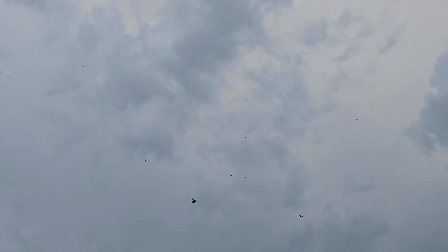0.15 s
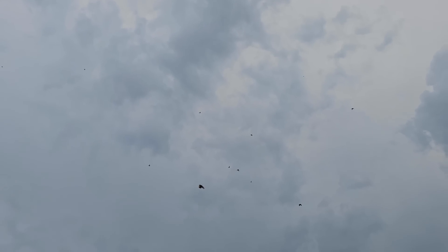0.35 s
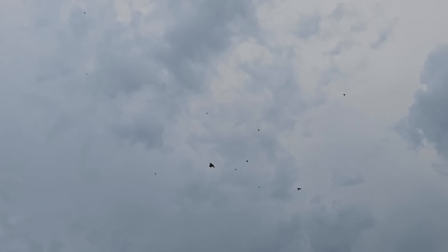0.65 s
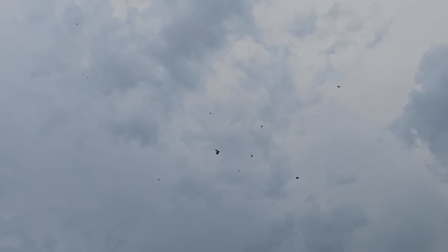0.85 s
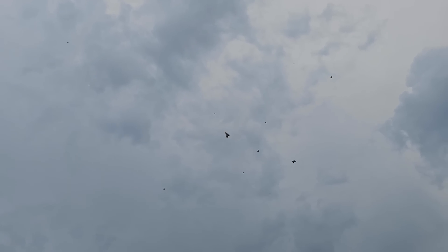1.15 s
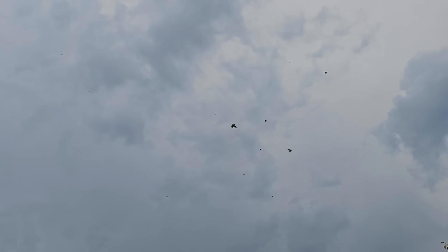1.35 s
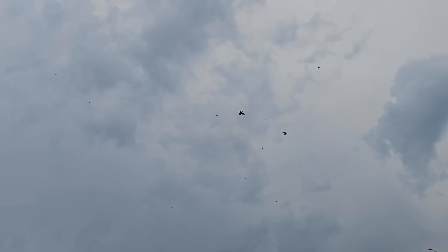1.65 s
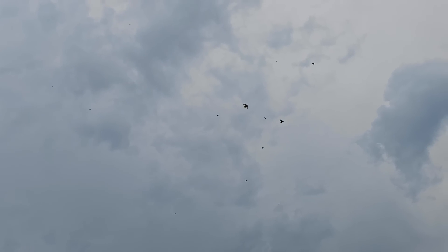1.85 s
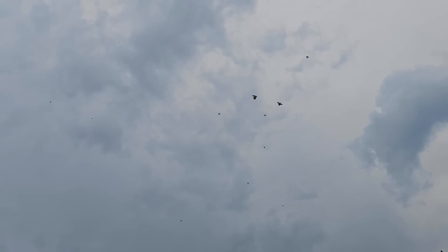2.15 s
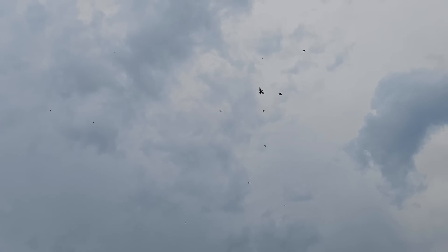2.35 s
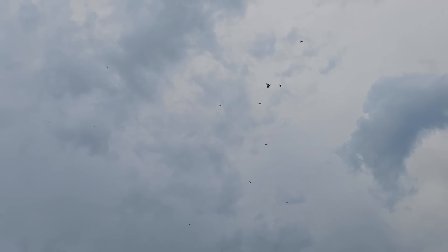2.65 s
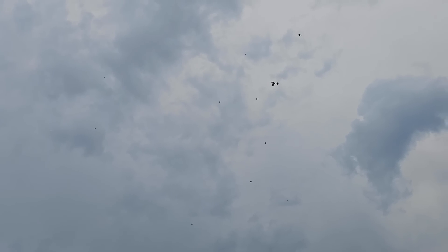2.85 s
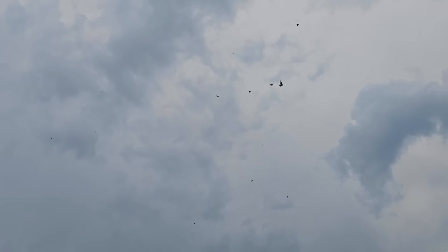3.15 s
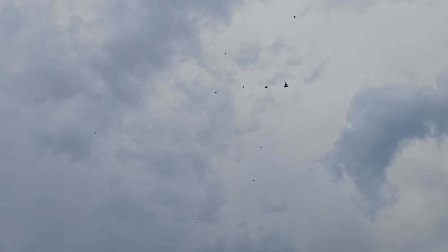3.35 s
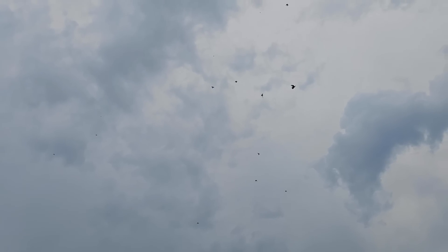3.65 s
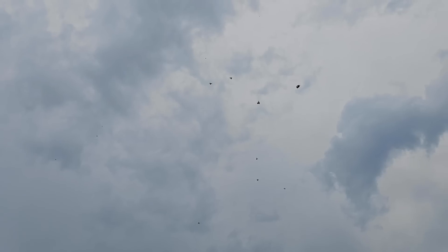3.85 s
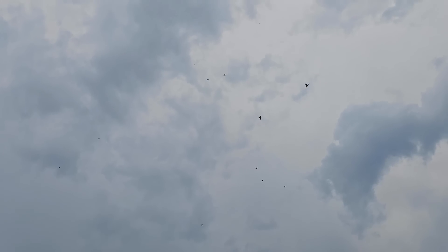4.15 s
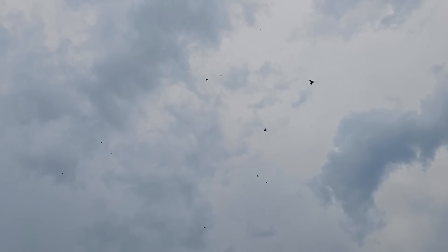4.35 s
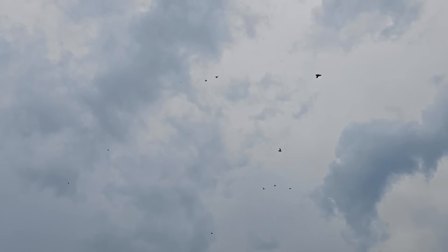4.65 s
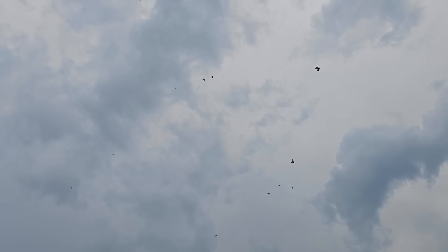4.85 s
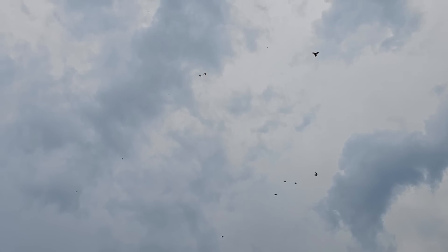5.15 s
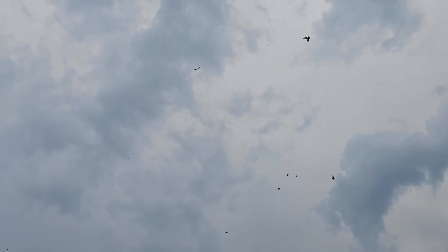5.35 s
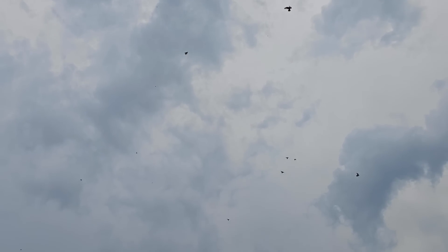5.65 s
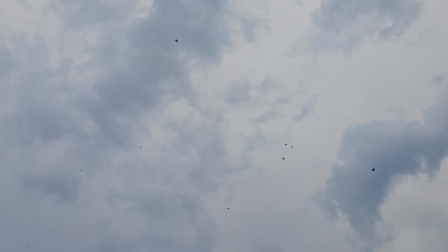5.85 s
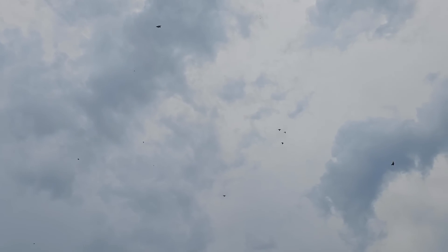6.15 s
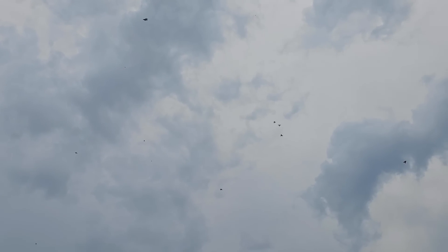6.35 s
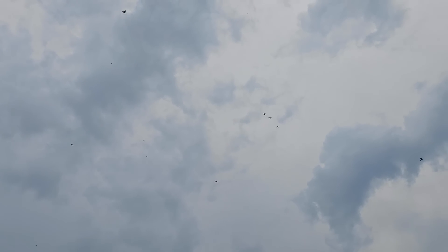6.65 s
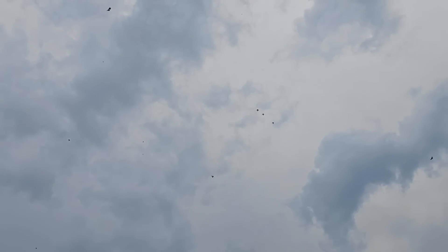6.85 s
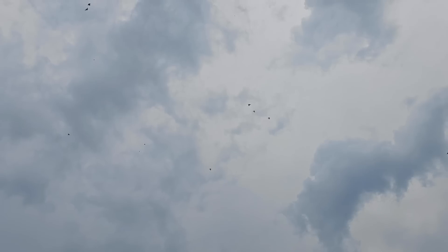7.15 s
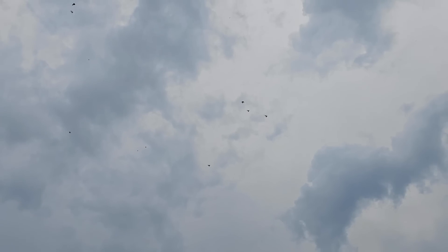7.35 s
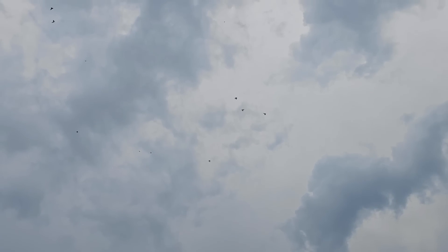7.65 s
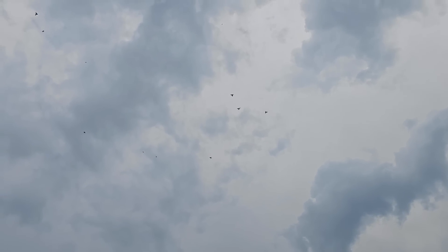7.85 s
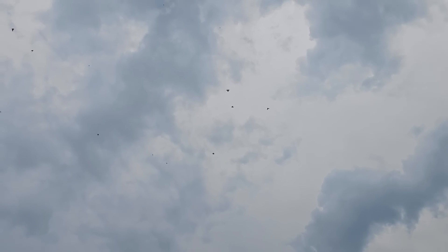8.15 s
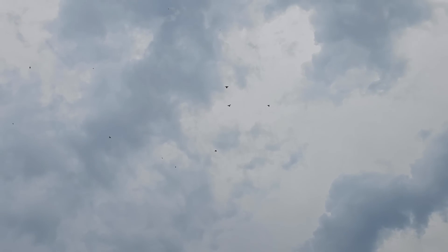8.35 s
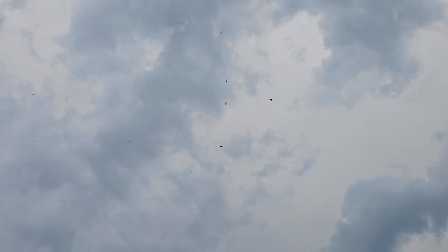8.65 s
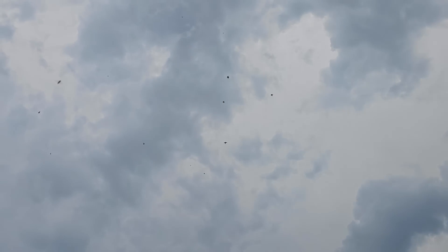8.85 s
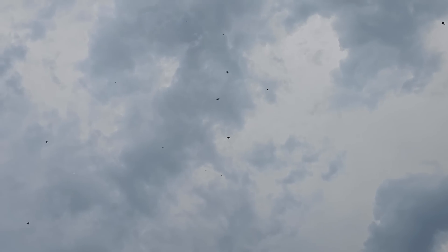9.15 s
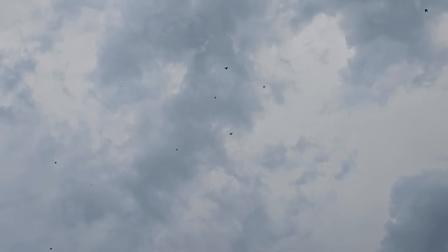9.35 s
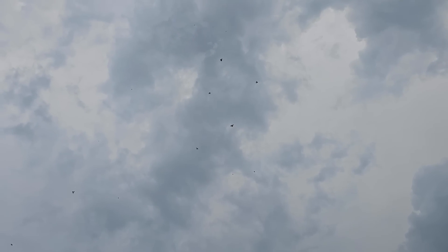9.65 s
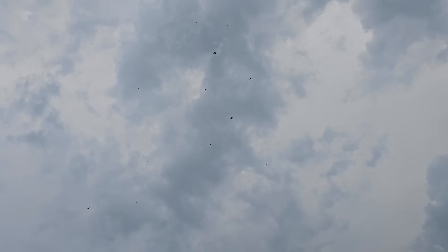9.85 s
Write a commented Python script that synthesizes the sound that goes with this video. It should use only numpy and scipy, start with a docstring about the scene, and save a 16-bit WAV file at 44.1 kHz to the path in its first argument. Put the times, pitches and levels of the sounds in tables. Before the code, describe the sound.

Wind buffets the microphone throughout with uneven low thuds, strongest around 1.3 seconds, from 6.7 to 7.4, and near 8.8. A young pigeon, slightly to the left, gives thin, high, wavering squeals, each about half a second long, repeating roughly every 0.7 seconds, then weaker and more spaced after 6 seconds. Pigeons fly about with scattered wing claps and soft feather rustles, clearer from 2 seconds. Birds land on a hollow board with light knocks at about 4.4 and 6.7 seconds. Quiet cooing runs underneath, swelling around 7.5 to 8 seconds. Small birds whistle and chirp far off, mostly in the first 3 seconds, over a faint town hiss. From 8.7 seconds a quick run of sharper wing claps builds, joined by a brief scrape on the microphone at 9.6 and a few small wind pops until the end at 10.

```python
"""Pigeons on an open roof, heard by a small camera with two spaced microphones.
A young pigeon squeals again and again with two membranes; wing tips clap, feathers rustle, birds
land on a hollow board and the flock coos from inflated crops. Gusts thud and pop on the microphones
and something brushes the camera. Small birds whistle and chirp far off over the hiss of the town."""
import sys
import numpy as np
from scipy import signal
from scipy.fft import rfft, irfft
from scipy.io import wavfile
from scipy.ndimage import uniform_filter1d

SR = 44100
rng = np.random.default_rng(int(sys.argv[2]) if len(sys.argv) > 2 else 0)


def store_wav(level_fs):
    """Save 16-bit WAV to argv[1]."""
    pcm = np.round(np.clip(np.atleast_2d(level_fs), -1, 1) * 32767)
    wavfile.write(sys.argv[1], SR, pcm.T.astype(np.int16))


N = 441000

# Noise spectra. Each row: frequency in Hz, relative density in dB.
TOWN_SPECTRUM = [(120, -77), (200, -7), (254, 1.5), (366, -19.5), (491, -8), (968, -18.5), (2050, -18),
                 (2610, -23.5), (4430, -16), (5840, -25), (8120, -27.5), (11300, -26.5), (16000, -36)]
COO_BLUR_SPECTRUM = [(200, -1), (290, 0.5), (400, -2), (540, 1.5), (640, -22.5), (800, -17.5)]
THUD_SPECTRUM = [(8.8, -24), (15, -15), (43, 10), (65, 7), (116, -3), (193, -31), (236, -16.5), (300, -26),
                 (390, -69), (660, -120)]
EDDY_SPECTRUM = [(60, -19), (110, 2), (160, -10), (260, -17.5), (450, -57), (1000, -91), (2500, -100)]
FEATHER_SPECTRUM = [(410, 10), (700, 3.5), (1120, -6), (1310, -0.5), (1500, -2), (1600, -3), (2770, 0),
                    (4550, 3), (7010, -9), (9990, -8), (16000, -15)]
# Far whistles. Each row: start and length in seconds, pitch, slide and arch in Hz, level in dB.
WHISTLE_NOTES = [(.33, 0.33, 897, -13, 8.5, -66), (1.189, 0.028, 864, -19, 27, -56),
                 (1.443, 0.13, 1696, 197, 21, -67.5), (2.113, 0.19, 4800, -230, 42, -64),
                 (2.267, 0.14, 2025, -32, -40, -64), (2.602, 0.076, 2640, -50, 824, -52),
                 (2.67, 0.15, 2324, -94, -11, -59), (2.854, 0.081, 2330, 25, 46, -62.5),
                 (3.438, 0.11, 2080, 45, 48, -62.5), (4.683, 0.114, 1925, -38, 10.5, -66),
                 (4.689, .07, 1270, -10, -2, -65), (7.951, 0.16, 1335, -100, 2, -65),
                 (8.545, 0.072, 1400, 34, -7, -63)]
# Sparrow chirps. Each row: start and length in seconds, level in dB.
CHIRP_NOTES = [(.565, 0.06, -62), (0.932, 0.064, -54.5), (1.302, 0.22, -62.5), (1.752, 0.1, -64),
               (2.25, 0.064, -68), (2.68, .05, -64), (2.845, 0.059, -60.5), (4.28, 0.067, -63),
               (6.32, 0.062, -56.5), (7.008, 0.049, -58), (8.564, 0.034, -58)]
# Far cooing. Each row: time in seconds, level in dB.
COOING_CURVE = [(0.0, -52), (0.22, -68.5), (1.25, -57), (1.5, -64.5), (4.46, -55), (7.32, -57),
                (7.44, -51.5), (7.71, -57.5), (7.8, -48), (8.33, -60.5), (9.89, -51.5), (10.0, -53)]
# Nearer coos. Each row: time in seconds, level in dB, pitch in Hz.
COO_PULSES = [(1.954, -51, 306), (2.944, -49, 301), (3.05, -47, 311), (3.32, -49.5, 279),
              (3.416, -47.5, 281), (3.996, -49, 312), (4.087, -52, 294), (4.791, -52, 300),
              (4.947, -50, 302), (5.081, -50, 339), (5.151, -49, 261), (6.023, -48.5, 284),
              (6.18, -47, 288), (7.427, -43, 410), (7.484, -40, 370), (7.557, -47.5, 333),
              (7.768, -45.5, 359), (7.847, -43.5, 482), (7.965, -47.5, 365)]
# Gusts. Each row: time in seconds, level in dB, eddies over that level in dB, leftward pan in dB.
GUST_CURVE = [(0.0, -30.5, 0, -6), (0.39, -42.5, -20, 0), (0.78, -30.5, -5, -11), (1.2, -40.5, -11, -3),
              (1.34, -23, -15, -12), (1.72, -42, -14.5, -6.5), (2.31, -34, -12.5, -12.5),
              (3.26, -39.5, -7, 9), (3.79, -36, -27, -11), (3.92, -48.5, -18, -5), (5.35, -38, -16.5, 4),
              (5.96, -48, -17.5, 0), (6.4, -39, -16, 4.5), (6.74, -33.5, -9.5, 20), (6.91, -37, -18, -24),
              (7.21, -34.5, -7.5, -5), (7.74, -42, -17, -1), (7.88, -32.5, -7.5, -6),
              (8.19, -38.5, -26, 3.5), (8.88, -34.5, -6.5, 10), (8.94, -32.5, -13, -5),
              (9.36, -42.5, -15, 0), (9.62, -41.5, 1, -1.5), (9.78, -39, 3, -0.5), (10.0, -47, 4, 1)]
# Wind thumps. Each row: centre in seconds, level in dB, left minus right in dB, pitch in Hz.
WIND_THUMPS = [(0.019, -25.5, 5.5, 96), (0.621, -25.5, 0, 58.0), (0.689, -23, -9, 87.5),
               (0.76, -24, -3, 66.5), (0.853, -38, 0, 76.0), (0.911, -19.5, 0, 71.0),
               (1.008, -24, -12, 97.0), (1.281, -14.5, -7, 68), (1.428, -23.5, -14, 94.5),
               (1.489, -20, -7, 70.6), (1.567, -23, -6, 73.5), (2.516, -23, 5, 81),
               (2.636, -33, -8.0, 72.5), (2.849, -21.5, 4.5, 90), (2.954, -24.5, 7, 103),
               (3.045, -23, -9, 98), (3.183, -29, 1, 69.4), (3.436, -30, 9.5, 89), (3.687, -27, -5, 78.4),
               (3.768, -29.5, -7, 89), (4.617, -30, -7, 58), (4.712, -28, -3, 53.3),
               (5.151, -28.5, -11, 76), (5.442, -23.5, 7, 68.6), (5.509, -25.5, -6.5, 90),
               (6.16, -27.5, -3.5, 51.0), (6.657, -25, 6.0, 63.0), (6.704, -19, 4, 71.6),
               (6.742, -18, 5, 66.0), (6.836, -24.5, 3, 58.7), (6.977, -22.0, -4, 67.0),
               (7.054, -24.5, -5.0, 65.0), (7.1, -24.5, -3, 69.0), (7.155, -18.5, -6, 71.0),
               (7.224, -18, -6, 84), (7.321, -17, -5.5, 74.5), (7.395, -23.5, -6, 76),
               (7.856, -25, -7, 66.4), (8.319, -29, 9.5, 79.5), (8.504, -28, 7, 65.0),
               (8.595, -22.5, 7, 72.6), (8.685, -27, 4.0, 65.0), (8.8, -17.5, 10, 72),
               (8.879, -20, 7, 62.8), (9.123, -25, -7, 65), (9.755, -21.5, 1, 85)]
# Wind pops. Each row: start in seconds, relative level in dB, left minus right in dB.
PORT_POPS = [(0.068, -49.5, -28), (0.101, -48.5, -28), (1.048, -43.5, -26.5), (1.325, -48.5, -25),
             (9.564, -48, -6), (9.67, -42, -3.5), (9.78, -47, -23), (9.862, -39, 0), (9.927, -44, -2),
             (9.968, -40, 1)]
# Landings on the board. Each row: start in seconds, level in dB.
LANDINGS = [(4.383, -46), (6.67, -37)]
# Board modes. Each row: frequency in Hz, gain in dB, T60 in seconds.
BOARD_MODES = [(815, 0, 0.011), (1550, -6, 0.019), (2390, 2, 0.039), (2570, 0.5, 0.032), (4150, -1, 0.014)]
# Flock rustle. Each row: time in seconds, level in dB, treble in dB.
RUSTLE_CURVE = [(0.0, -82, -23), (0.47, -69, -4), (0.7, -68.5, -20), (3.7, -61, -10.5), (4.18, -68, -17),
                (5.96, -62, -5.5), (6.43, -64.5, -15), (9.0, -64, -4), (9.3, -56, -2), (10.0, -68.5, -15)]
# Passing wings. Each row: centre and length in seconds, level in dB, treble in dB.
WING_SWEEPS = [(0.226, 0.42, -59, -32), (0.618, 0.21, -58.5, -20), (1.019, 0.2, -58.5, -4),
               (1.6, 0.067, -58.5, -6), (3.083, 0.21, -61.5, -12), (3.358, .06, -65, 11),
               (3.715, .06, -52, -9), (4.423, 0.12, -50.5, -26), (4.964, 0.11, -56.5, 7),
               (5.037, 0.2, -53, -9.5), (5.803, 0.11, -54, -48), (6.707, .08, -60, -34),
               (6.882, 0.15, -60.5, -3), (7.454, 0.11, -61, -1), (9.53, 0.18, -71.5, 22),
               (9.594, 0.11, -53, -9), (9.787, 0.62, -56.5, -9.5)]
# Claps. Each row: start in seconds, relative high, mid and low band levels in dB, swish re crack in dB.
WING_CLAPS = [(0.564, -63.5, -59, -80, 0.5), (0.968, -68, -57, -91, 4.5), (2.1047, -53, -39, -41.5, -28),
              (2.229, -60.5, -50.5, -64, -7), (2.399, -53, -68, -65, -20), (2.5354, -55, -56, -54, -20),
              (2.759, -47.5, -43, -46, -21), (3.121, -61, -41.5, -70, -21), (3.356, -55, -45, -45.5, -11),
              (3.711, -68, -52, -43.5, -8), (3.722, -57, -47, -49, -18), (4.384, -50.5, -40, -36, -11.5),
              (4.979, -74, -50, -53.5, -8), (5.0183, -69, -45.5, -53, -10), (5.246, -62, -52, -61, -1),
              (5.42, -57, -47, -48.5, -15), (5.67, -57, -53, -48.5, -9.5), (5.8268, -65, -58, -48, -13),
              (5.952, -60, -54.5, -84, -3), (6.4348, -65, -49, -44, -21), (6.6692, -58, -60, -41, -26),
              (7.424, -60, -54, -66, -7), (8.7218, -59, -56, -55, -8), (8.8306, -53, -48, -55, -10),
              (8.93, -50.5, -77, -52.5, -8.5), (9.0732, -33.5, -76, -42.5, -19),
              (9.203, -47, -55, -48, -16), (9.32, -37, -36, -43.5, -16), (9.4435, -48, -47, -61, -18),
              (9.562, -52, -54, -59, -10), (9.739, -40, -39.5, -40, -21)]
# Direction of the claps. Each row: start in seconds, lag of left behind right in samples.
CLAP_LAGS = [(0, -19), (4.3, 11), (5.6, -18), (6.4, 12), (8.0, -18)]
# One table per squeal. Each row: time in seconds, pitch in Hz, level in dB.
SQUEAL_CURVES = [
    [(.061, 3780, -54), (.083, 4660, -54), (.13, 4300, -49.5), (.165, 4000, -50), (.213, 4250, -45),
     (.245, 4140, -51), (.305, 4310, -42.5), (.375, 4330, -47), (.421, 4655, -46), (.469, 4370, -43),
     (.52, 4310, -46.5), (.548, 3750, -53)],
    [(.782, 3930, -53), (.826, 4130, -50), (.878, 3920, -41), (.915, 4164, -46), (.95, 4095, -44.5),
     (1.004, 4405, -41), (1.022, 4426, -60), (1.036, 3980, -53), (1.095, 4300, -47.5), (1.13, 4180, -48.5),
     (1.175, 4830, -55), (1.24, 4780, -59)],
    [(1.439, 3720, -54), (1.453, 4230, -54.5), (1.55, 4140, -50.5), (1.735, 4250, -44), (1.757, 4150, -46),
     (1.785, 3840, -50), (1.80, 4224, -49.5), (1.881, 4160, -48.5), (1.922, 3770, -47.5)],
    [(2.195, 3890, -50), (2.239, 3870, -45), (2.255, 3820, -59), (2.3, 4030, -47), (2.34, 4300, -53.5),
     (2.45, 4260, -49), (2.483, 4000, -58), (2.505, 4290, -45), (2.535, 4210, -46.5), (2.645, 4260, -52),
     (2.67, 3830, -53)],
    [(2.94, 3770, -54), (2.961, 3940, -46), (2.989, 3860, -50), (3.02, 3990, -54.5), (3.077, 4130, -51.5),
     (3.135, 4330, -49.5), (3.159, 4270, -48), (3.33, 4114, -47.5), (3.365, 4260, -44), (3.4, 4330, -48.5),
     (3.45, 3980, -66)],
    [(3.643, 3940, -49), (3.68, 4250, -43.5), (3.71, 4060, -47), (3.755, 4300, -50), (3.89, 4264, -41),
     (3.915, 4190, -48), (3.953, 4230, -42.5), (3.968, 4730, -49), (3.991, 4800, -53.5), (4.035, 4350, -45),
     (4.12, 4110, -48.5), (4.155, 3630, -58)],
    [(4.413, 3790, -58), (4.427, 4010, -48), (4.477, 4290, -50), (4.519, 4060, -55), (4.557, 4310, -47),
     (4.633, 4240, -48.5), (4.717, 4480, -46), (4.749, 4270, -49), (4.767, 3680, -48.5), (4.785, 3650, -56)],
    [(5.07, 3970, -51), (5.15, 4110, -55), (5.17, 4780, -54.5), (5.21, 4530, -51.5), (5.275, 3900, -51.5),
     (5.3, 4170, -48.5), (5.382, 4197, -46.5), (5.43, 4090, -47), (5.455, 3770, -62), (5.5, 3790, -45)],
    [(5.85, 3750, -72), (6.033, 3920, -52), (6.073, 3863, -48.5), (6.131, 4060, -51), (6.157, 3900, -48),
     (6.205, 3930, -58), (6.23, 4110, -52), (6.31, 4160, -53), (6.37, 3610, -61)],
    [(6.725, 3950, -63), (6.802, 3750, -58.5), (6.864, 3940, -52), (6.885, 4270, -60), (6.925, 4000, -55),
     (7.106, 3850, -51.5), (7.14, 3800, -66), (7.23, 3550, -60)],
    [(7.87, 3808, -65), (7.972, 3740, -56.5), (8.074, 3980, -60), (8.114, 4370, -60), (8.132, 4130, -53.5),
     (8.164, 3790, -61), (8.22, 3990, -51), (8.27, 3920, -64), (8.4, 3490, -58)],
    [(8.709, 3780, -73), (8.721, 4040, -53), (8.825, 3860, -60.5), (8.901, 4190, -59), (8.975, 3950, -51.5),
     (9.023, 3830, -56), (9.071, 3850, -50), (9.12, 3630, -60)],
    [(9.457, 4200, -56.5), (9.577, 4240, -61)],
    [(9.752, 4280, -57), (9.82, 4290, -61), (9.95, 3760, -69)],
]
# Voice of each squeal. Each row: hoarseness from 0 to 1, octave overtone in dB.
SQUEAL_VOICES = [(0.28, -28), (0.18, -38), (0.23, -34), (0.26, -40), (0.21, -38), (0.12, -37), (0.34, -36),
                 (0.19, -28), (0.08, -23), (0.26, -26), (0.43, -24), (0.3, -29), (0.96, -30), (0.83, -39)]

BIN_HZ = np.fft.rfftfreq(512, 1 / SR)
FRAMES = N // 128 + 4
PAN = np.array([[.5], [-.5]])  # left and right share of a level difference


def gain_of(db):
    """Decibels to a factor."""
    return 10 ** (np.asarray(db) / 20)


def unit_rms(x):
    """Scales to rms 1."""
    return x / np.sqrt(np.mean(x ** 2) + 1e-20)


def phase_of(hz):
    """Running phase in radians of a pitch curve."""
    return 2 * np.pi * np.cumsum(hz) / SR


def bandpass(x, band_hz):
    """Butterworth band-pass."""
    return signal.sosfilt(signal.butter(2, band_hz, "band", fs=SR, output="sos"), x)


def curves(rows, t):
    """The columns of a time table at the times t."""
    times_s, *columns = np.transpose(rows)
    return [np.interp(t, times_s, column) for column in columns]


def add(mix, start_s, sound):
    """Mixes a sound in at start_s."""
    part = mix[..., round(start_s * SR):][..., :sound.shape[-1]]
    part += sound[..., :part.shape[-1]]


def wander(count, rate_hz):
    """Smooth noise of rms 1 that changes at about rate_hz."""
    span = max(int(SR / rate_hz / 2), 1)
    return unit_rms(uniform_filter1d(uniform_filter1d(rng.standard_normal(count), span), span))


def coloured(x, spectrum, unit_band_hz):
    """Gives unit white noise a spectrum, with rms 1 inside unit_band_hz."""
    hz = np.fft.rfftfreq(x.shape[-1], 1 / SR)
    points_hz, points_db = np.transpose(spectrum)
    outside = (hz < points_hz[0] / 2) | (hz > points_hz[-1] * 2)
    shape = gain_of(np.interp(np.log(hz + 1), np.log(points_hz + 1), points_db) - 73 * outside)
    inside = (hz > unit_band_hz[0]) & (hz < unit_band_hz[1])
    return irfft(rfft(x) * shape, x.shape[-1]) / np.sqrt(np.sum(shape[inside] ** 2) / len(hz))


def noise_pair(correlation, left_lag_samples=0):
    """Partly alike white noise at the two microphones."""
    a, b = rng.standard_normal((2, N))
    return np.array([np.roll(a, left_lag_samples), correlation * a + np.sqrt(1 - correlation ** 2) * b])


def patches(bins, frames):
    """A random field of rms 1 with blobs about bins wide and frames long."""
    field = rng.standard_normal((len(BIN_HZ), FRAMES))
    return unit_rms(uniform_filter1d(uniform_filter1d(field, bins, 0), frames, 1))


def rolloff(edge_hz, order):
    """Weight per bin, falling from 1 to 0 around edge_hz."""
    return 1 / (1 + (BIN_HZ[:, None] / edge_hz) ** order)


def patched(x, field_db):
    """Scales the short-time spectrum by a field of bins x frames."""
    spectra = signal.stft(x, nperseg=512, noverlap=384)[2]
    spectra = spectra * gain_of(field_db[:, :spectra.shape[-1]])
    return signal.istft(spectra, nperseg=512, noverlap=384)[1][:, :N]


def walls(x, t60_s):
    """Sparse wall echoes of random sign, different at each microphone."""
    taps = np.zeros((2, SR // 2))
    slots = np.arange(200, SR // 2 - 20, 20)
    delays = slots + rng.integers(0, 20, (2, len(slots)))
    np.put_along_axis(taps, delays, rng.choice([-1., 1.], delays.shape), 1)
    taps *= gain_of(-60 * np.arange(SR // 2) / SR / t60_s)
    return signal.fftconvolve(np.atleast_2d(x), taps / np.linalg.norm(taps[0]), axes=1)[:, :N]


def town():
    """Steady far hiss, slightly patchy, stronger on the left."""
    hiss = coloured(noise_pair(0.055), TOWN_SPECTRUM, (430, 17000))
    return gain_of(-64 + 3.6 * PAN) * patched(hiss, 3.55 * patches(10, 30) * rolloff(5500, 4))


def whistle(length_s, pitch_hz, slide_hz, arch_hz, level_db):
    """A far note that slides and arches, made unsteady by the air."""
    t = np.arange(0, length_s, 1 / SR)
    hz = pitch_hz + slide_hz * t / length_s + arch_hz * np.sqrt(abs(np.sin(np.pi * t / length_s)))
    tone = np.sqrt(2) * np.sin(phase_of(hz * (1 + 0.013 * wander(len(t), 120))))
    return gain_of(level_db + 2 * wander(len(t), 40)) * tone * signal.windows.tukey(len(t), .4)


def chirp(length_s, level_db, pitch_hz=3150, scatter_hz=129):
    """A far sparrow's scratchy note; pitch and level tremble."""
    count = round(length_s * SR)
    tone = np.sin(phase_of(pitch_hz + scatter_hz * wander(count, 180)))
    return gain_of(level_db + 8.6 * wander(count, 60)) * tone * signal.windows.tukey(count, .5)


def coo(pitch_hz, glide, crop_top_hz=690):
    """A soft note with its octave, which the crop passes only on low notes."""
    phase = phase_of(pitch_hz * glide)
    octave_gain = gain_of(-7) / (1 + (2 * pitch_hz / crop_top_hz) ** 20)
    return np.sin(phase) + octave_gain * np.sin(2 * phase)


def far_cooing():
    """Many far throats overlap: short sliding notes over a blur of low noise."""
    level_db, = curves(COOING_CURVE, np.arange(N) / SR)
    notes = np.zeros(N)
    for when, pitch, length, slide, size in rng.random((140, 5)):
        t = np.arange(0, 0.024 + 0.066 * length, 1 / SR)
        note = coo(230 + 130 * pitch, glide=1 + 0.89 * (slide - .5) * t)
        add(notes, when * N / SR, gain_of(5.2 * size) * np.hanning(len(t)) * note)
    notes = unit_rms(notes)
    blur = coloured(noise_pair(0.99, left_lag_samples=-15), COO_BLUR_SPECTRUM, (242, 650))
    return gain_of(level_db + 1.6 * PAN) * (0.59 * np.array([notes, np.roll(notes, 11)]) + 0.7 * blur)


def near_coos():
    """Soft low pulses from an inflated crop, each sinking a little."""
    out, t = np.zeros(N), np.arange(0, .055, 1 / SR)
    envelope = np.sin(np.pi * np.sqrt(t / t[-1])) ** 2
    for time_s, level_db, pitch_hz in COO_PULSES:
        add(out, time_s - .006, gain_of(level_db) * envelope * coo(pitch_hz, glide=1.04 - 1.9 * t))
    return np.array([out, np.roll(out, 11)]) + gain_of(-14) * walls(out, t60_s=0.54)


def scuff(start_s=9.558, length_s=.1, band_hz=(360, 1010)):
    """Something brushes the camera: a gritty, fading scrape."""
    out, count = np.zeros((2, N)), round(length_s * SR)
    grit = noise_pair(0.95)[:, :count] * gain_of(2.6 * wander(count, 180))
    envelope = gain_of(-48.5 - 5.6 * np.linspace(0, 1, count) ** 2) * signal.windows.tukey(count, .15)
    add(out, start_s, envelope * unit_rms(bandpass(grit, band_hz)))
    return out


def gusts():
    """Lumpy wind pressure: a soft thud, and sharper eddies that differ between the microphones."""
    level_db, eddy_db, pan_db = curves(GUST_CURVE, np.arange(N) / SR)
    sides_db = pan_db * PAN
    lumps_db = 7.5 * np.clip(wander(N, 14), -2.2, .5)
    thud = coloured(noise_pair(0.89) * unit_rms(gain_of(lumps_db)), THUD_SPECTRUM, (10, 130))
    flutter_db = .8 * lumps_db + 6 * np.tanh([wander(N, 25), wander(N, 25)])
    eddies = noise_pair(0.96) * unit_rms(gain_of(flutter_db)) * gain_of(level_db + eddy_db + sides_db)
    return thud * gain_of(level_db + 0.49 * sides_db) + coloured(eddies, EDDY_SPECTRUM, (111.6, 260))


def wind_thumps(rise_s=0.014, fall_s=0.0085, skew=0.35):
    """Each thump is one or two lopsided low swings of pressure."""
    pad = 2000
    out, t = np.zeros((2, N + 2 * pad)), np.arange(-pad, pad) / SR
    envelope = np.exp(-np.where(t < 0, t / rise_s, t / fall_s) ** 2)
    for centre_s, level_db, pan_db, pitch_hz in WIND_THUMPS:
        phase = 2 * np.pi * (pitch_hz * t + rng.random())
        add(out, centre_s, gain_of(level_db + pan_db * PAN) * envelope * np.sin(phase + skew * np.sin(phase)))
    return out[:, pad:N + pad]


def wind_pops():
    """Each pop is one damped swing of the air in a microphone port, with a little grit."""
    out, t = np.zeros((2, N)), np.arange(900) / SR
    for (start_s, level_db, pan_db), hz in zip(PORT_POPS, rng.uniform(313, 589, len(PORT_POPS))):
        swing = np.sin(2 * np.pi * hz * t) * np.exp(-t / 0.0022) * np.minimum(t / .002, 1)
        grit = uniform_filter1d(rng.standard_normal(len(t)), size=14) * np.exp(-t / 0.0021)
        grit = uniform_filter1d(grit * np.minimum(t / .001, 1), size=12)
        add(out, start_s, gain_of(level_db + 10 + pan_db * PAN) * (swing + 0.39 * grit))
    return out


def landings():
    """A bird lands on the right; the hollow board rings briefly."""
    out, t = np.zeros(N), np.arange(3000) / SR
    ring = sum(gain_of(db - 60 * t / t60_s) * np.sin(2 * np.pi * hz * t) for hz, db, t60_s in BOARD_MODES)
    for start_s, level_db in LANDINGS:
        add(out, start_s, gain_of(level_db) * ring)
    return np.array([np.roll(out, 11), out]) + gain_of(-12.5) * walls(out, t60_s=0.073)


def rustle(neutral_treble_db=-6):
    """Feather noise in short tufts; each passing wing swells and fades over the flock."""
    t = np.arange(FRAMES) * 128 / SR
    level_db, treble_db = curves(RUSTLE_CURVE, t)
    treble_band = np.exp(-(np.log2(BIN_HZ[:, None] / 8400 + 1e-9) / .62) ** 2)
    shelf, top = 1 - rolloff(5500, 8), 1 - rolloff(10800, 8)
    power = gain_of(level_db + treble_band * (treble_db - neutral_treble_db)) ** 2
    for centre_s, length_s, wing_db, wing_treble_db in WING_SWEEPS:
        lift_db = wing_treble_db - neutral_treble_db
        # bright wings sing in one band, dull ones lose all treble
        weight = treble_band ** 3 - .7 * top if lift_db > 0 else shelf
        power += gain_of(wing_db + weight * lift_db) ** 2 * np.exp(-(4 * (t - centre_s) / length_s) ** 2)
    tufts_db = 2 * patches(60, 6) + 3.66 * patches(8, 16) * rolloff(5500, 4)
    feathers = coloured(noise_pair(0.019, left_lag_samples=-21), FEATHER_SPECTRUM, (460, 8000))
    return patched(feathers, 10 * np.log10(power) + tufts_db)


def wing_claps(faint_per_s=3, faint_db=(-64, -60, -64, -11)):
    """Wing tips meet: a short crack in three bands, then feathers swish shut."""
    out, t = np.zeros((2, N + 3000)), np.arange(2600) / SR
    bands_hz = [(6600, 11800), (2540, 4530), (400, 2400)]
    lag_starts_s, lags_samples = np.transpose(CLAP_LAGS)
    faint_starts_s = rng.uniform(0, N / SR, round(faint_per_s * N / SR))
    faint_claps = [(start_s, *rng.normal(faint_db, 3)) for start_s in faint_starts_s]
    crack = np.minimum(t / 0.00037, 1) * np.exp(-t / 0.00064)
    for start_s, *bands_db, swish_db in WING_CLAPS + faint_claps:
        a, b = rng.standard_normal((2, len(t)))
        a = np.sign(a)  # every crack starts at full strength
        swish = gain_of(swish_db) * np.minimum(t / 0.0021, 1) * np.exp(-t / 0.009)
        lag_s = lags_samples[np.searchsorted(lag_starts_s, start_s) - 1] / SR
        # the crack reaches both microphones alike, the swish is spread over the wing
        left = a * (crack + swish)
        right = 0.86 * a * crack + b * (swish + 0.083 * crack)
        for side, noise in enumerate([left, right]):
            clap = sum(gain_of(db) * bandpass(noise, band) / np.std(bandpass(b, band))
                       for db, band in zip(bands_db, bands_hz))
            add(out[side], start_s + lag_s * (.5 - side), clap * gain_of(10 - 1.1 * side))
    return out[:, :N] + gain_of(-9) * walls(out[:, :N], t60_s=.2)


def squeal(rows, hoarse, octave_db, split_hz=320, flip_hz=265, beak_hz=(3500, 5100)):
    """A thin stepping whistle; a second membrane rasps above it, or below when the voice flips up."""
    t = np.arange(rows[0][0], rows[-1][0], 1 / SR)
    n = len(t)
    hz, level_db = curves(rows, t)
    flipped = 1 / (1 + np.exp((np.median(hz) + flip_hz - hz) / 40))
    warble = 0.00783 * np.round(wander(n, 31.5))
    jitter = 0.011 * wander(n, 70) + 0.028 * hoarse * wander(n, 220)
    phase = phase_of(hz * (1 + warble + jitter))
    split_phase = phase_of(split_hz + 80 * wander(n, 25) + 100 * wander(n, 300))
    upper_gain = 1.9 * hoarse * np.hanning(n) ** .3 * gain_of(5 * np.tanh(wander(n, 14)))
    upper = upper_gain * np.sin(phase + split_phase)
    lower = (.95 * flipped + .02) * np.sin(phase - split_phase)
    # the membrane slaps shut unevenly, roughening the upper edge of the note
    slap_phase = phase_of(160 + 70 * wander(n, 60))
    note = gain_of(3.1 * wander(n, 70)) * (np.sin(phase) + hoarse * np.sin(phase + slap_phase))
    overtone = gain_of(octave_db + 4 * wander(n, 12) + 4 * wander(n, 150)) * np.sin(2 * phase)
    voice = unit_rms(bandpass(note + upper + lower, beak_hz)) + overtone
    return gain_of(level_db) * voice * signal.windows.tukey(n, .02)


def bird_calls():
    """Squeals, whistles and chirps from the left, with wall echoes."""
    calls = np.zeros(N)
    for rows, voice in zip(SQUEAL_CURVES, SQUEAL_VOICES):
        add(calls, rows[0][0], squeal(rows, *voice))
    for start_s, *note in WHISTLE_NOTES:
        add(calls, start_s, whistle(*note))
    for start_s, *note in CHIRP_NOTES:
        add(calls, start_s, chirp(*note))
    direct = np.array([gain_of(0.5) * calls, gain_of(-1.5) * np.roll(calls, 20)])
    return direct + gain_of(-5) * walls(calls, t60_s=0.24)


def scene():
    """All sources at the two microphones."""
    background = town() + far_cooing() + near_coos()
    on_camera = scuff() + gusts() + wind_thumps() + wind_pops()
    return background + on_camera + landings() + rustle() + wing_claps() + bird_calls()


def record(dry):
    """The recorder's band limit."""
    edge_hz = 15830
    lowpass = signal.firwin(1023, edge_hz, window=("kaiser", 9), fs=SR)
    return signal.oaconvolve(dry, lowpass[None], "same")


dry = scene()
out = record(dry)
store_wav(out)
```